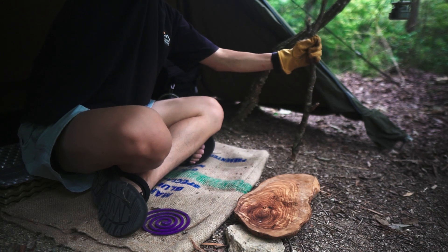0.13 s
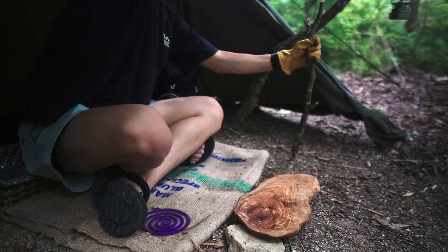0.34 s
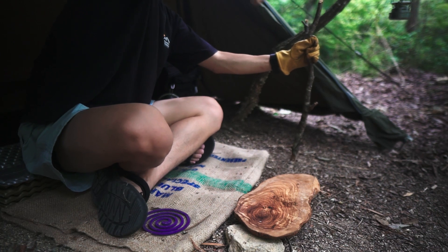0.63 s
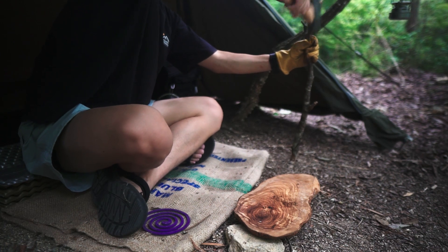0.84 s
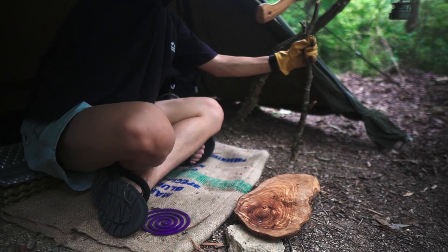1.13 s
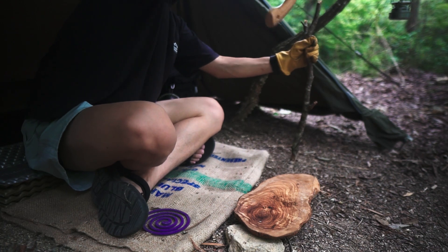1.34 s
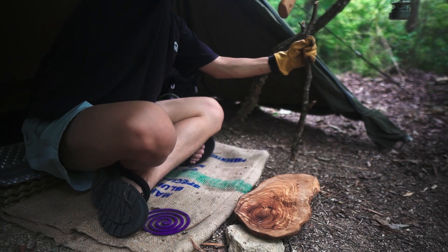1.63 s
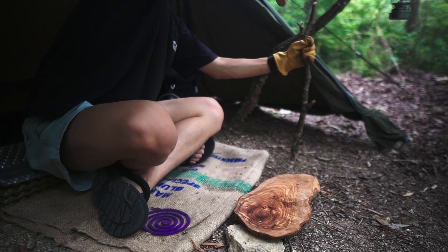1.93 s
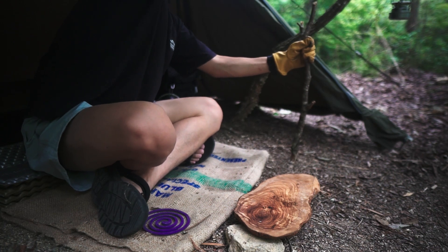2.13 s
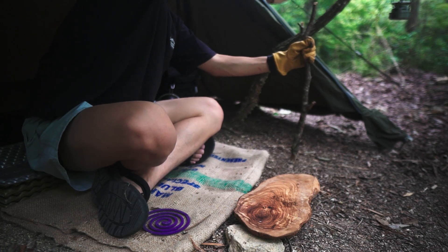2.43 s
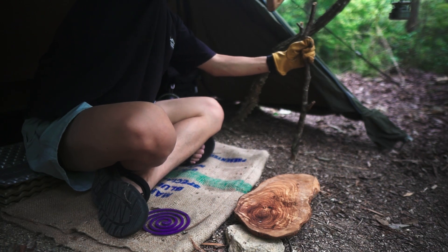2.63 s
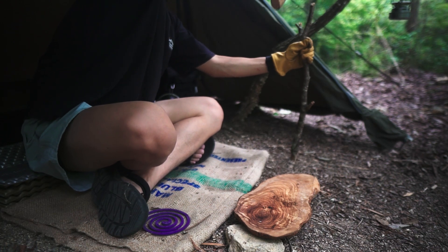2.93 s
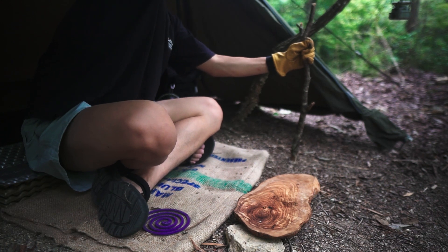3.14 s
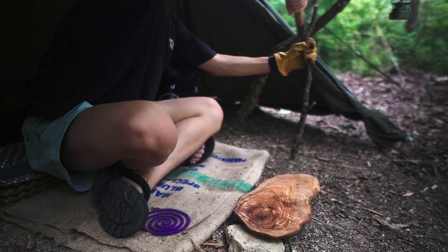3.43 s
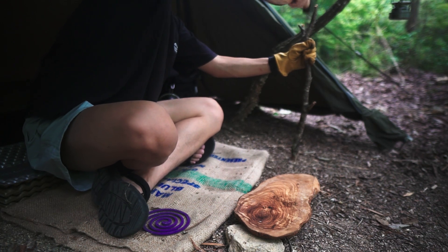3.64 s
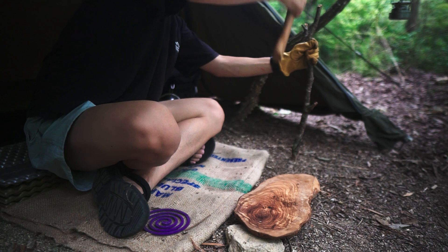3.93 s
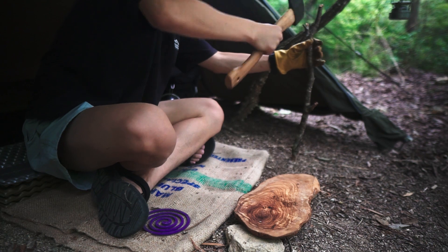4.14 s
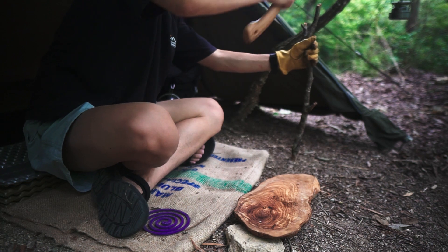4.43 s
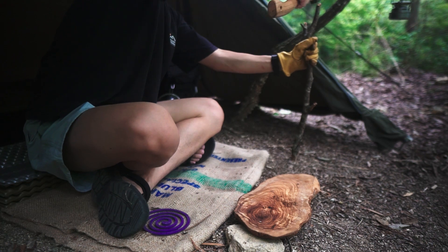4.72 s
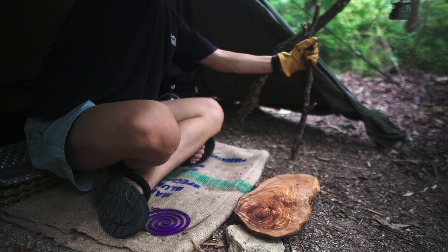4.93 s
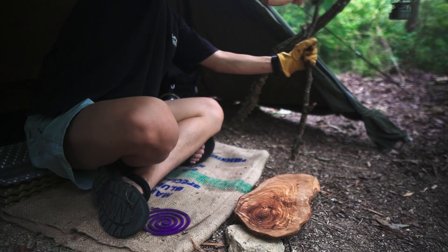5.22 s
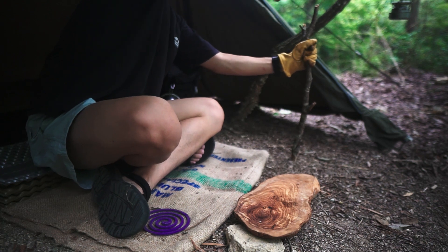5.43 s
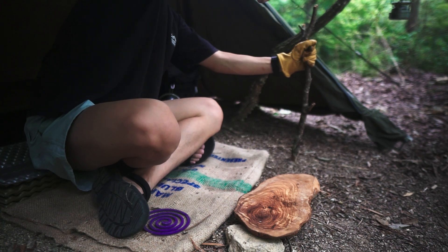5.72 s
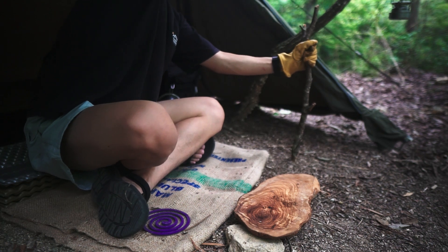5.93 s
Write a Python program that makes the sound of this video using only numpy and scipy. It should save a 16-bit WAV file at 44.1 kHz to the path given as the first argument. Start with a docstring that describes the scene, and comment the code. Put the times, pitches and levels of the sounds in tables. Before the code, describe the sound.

A hatchet drives a wooden stake into forest soil, so close that the blows slightly overload the microphone. Each is a short wooden crack with a dull ground thud and a brief echo. Two knocks land at 0.2 and 0.5 seconds, then a light, gritty graze on bark at 0.9. From 1.4 to 3.4 seconds come seven steady knocks, about three a second, the last thinner and brighter with a slight ring from the handle. The hammering pauses, and a sleeve rustles softly from 4 to 4.5 seconds. Two more blows land at 5.3 and 5.7 seconds, the last with a heavier thud. Throughout, distant insects make a faint high hiss, thin buzzes and repeated rising whistles over a low outdoor rumble. Nearer insects add clearer climbing calls around 4 seconds and again from 5 seconds until the end, at about 6.

```python
"""In a forest, a hatchet drives a wooden stake into the soil, so close that its cracks overload
the microphone. Each blow is a short crack of wood and a thud that the ground spreads into two
gliding waves; one stroke only grazes the bark. Far insects hiss, buzz and whistle on rising notes
over a low rumble. Later, nearer insects join in and a sleeve rustles as the arm comes down."""
import sys
import numpy as np
from scipy import signal
from scipy.fft import rfft, irfft
from scipy.io import wavfile

SR = 44100
rng = np.random.default_rng(int(sys.argv[2]) if len(sys.argv) > 2 else 0)


def master_out(mix):
    """Clip the mix to full scale and print it as 16-bit PCM to the path in sys.argv[1]."""
    frames = np.transpose(np.atleast_2d(mix))
    ceiling = np.clip(frames, -1, 1)
    pcm = np.round(ceiling * 32767).astype(np.int16)
    wavfile.write(sys.argv[1], SR, pcm)


N = 267687
TIME = np.arange(N) / SR

# Far insect whistles. Each row: start in seconds, length in seconds, top pitch in Hz, level in dB.
FAR_WHISTLES = [(0.0, 0.33, 1936, -42), (0.229, 0.4, 1900, -41), (0.791, 0.37, 1978, -40.5),
                (1.136, .46, 1900, -43), (1.581, 0.51, 1987, -40), (2.1, 0.31, 1914, -42.5),
                (2.37, .29, 1858, -41.5), (2.63, 0.35, 1987, -42), (2.98, 0.27, 1908, -40),
                (3.2, .33, 1994, -39), (3.519, 0.44, 1928, -43.5), (3.832, 0.32, 1984, -42),
                (4.421, 0.33, 1904, -44), (4.65, 0.28, 1870, -38.5), (5.41, 0.3, 1940, -36.5)]
# How well the insects send out each pitch. Each row: frequency in Hz, boost or cut in dB.
INSECT_RESPONSE = [(1400, -0.5), (2000, 0.5), (2650, -2.5), (3050, -10), (3400, 3), (3700, 3), (4100, 3),
                   (4800, 2), (5600, -8), (6200, -5), (10000, -18)]
# How loud the insect hiss is as time passes. Each row: time in seconds, level in dB.
HISS_LEVELS = [(0.0, -35), (0.42, -37), (0.69, -36.5), (1.42, -36.5), (1.52, -35), (1.89, -34.5),
               (2.69, -37.5), (3.33, -34), (3.52, -35), (3.82, -34), (4.11, -30.5), (4.33, -36),
               (4.68, -32.5), (5.14, -35), (5.8, -33), (6.07, -34.5)]
# The tone of the insects' hiss and of their high fizz. Each row: frequency in Hz, level in dB.
HISS_SPECTRUM = [(900, -26), (1300, -11), (1550, -3), (2000, -0.5), (2900, -2), (3900, 2), (4800, -1),
                 (6000, -8), (7500, -8.5), (9000, -20), (12000, -31)]
FIZZ_SPECTRUM = [(6000, -24), (9000, 6.5), (10300, 5.5), (12000, 0.5), (15000, 2.5), (16000, -6)]
# One thin insect's buzzes. Each row: start in seconds, length in seconds, level in dB.
BUZZ_PHRASES = [(0.0, 0.17, -51), (0.982, .22, -50.5), (1.57, .22, -68), (1.945, .17, -59),
                (2.329, .24, -59), (2.88, 0.19, -52), (3.202, .18, -58), (3.765, .24, -51.5),
                (4.26, 0.28, -47), (4.68, 0.42, -49.5), (5.352, 0.415, -48)]
# The tone of the outdoor rumble. Each row: frequency in Hz, level in dB.
RUMBLE_SPECTRUM = [(15, -9.5), (28, -31), (42, 8), (54, -11), (68, -0.5), (100, -5.5), (160, -12.5),
                   (300, -22.5), (600, -26.5), (1200, -27), (2500, -36)]
# Hatchet blows. Each row: time in seconds, crack level in dB, brightness in dB per octave,
# early thud, late thud, upper ground wave and handle levels in dB, pitch multiplier for the wood.
HATCHET_BLOWS = [(0.1985, 4.5, 0.5, 1, 1, 0.5, -12, 1.004), (0.5167, 2.5, 1.5, 2.5, 1.5, 1, -10, 1.02),
                 (1.44, -1, 1.5, 4, -0.5, 1, -12, 1), (1.7873, 2.5, 4.5, 2, 1, -0.5, -7, 1.01),
                 (2.1271, 2, 3, 2, 2.5, -1, -9, 1.05), (2.4493, 2, 2, 2, 2.5, -1.5, -30, 1.034),
                 (2.7648, 4.5, 1, 2.5, 2.5, -0.5, -28, 1.08), (3.0917, 4, 3, 1, 3, 0, -13, 1),
                 (3.4160, -1.5, 8.5, -13, -7.5, -1, 5, 0.86), (5.2871, 3.5, 0, 3.5, 1.5, 3.5, -29, 1.035),
                 (5.6861, -1.5, 1.5, 9, 1, 7, -27, 0.98)]
# The notes that ring in the struck end of the wood, the held stake, the hatchet's handle and the soil.
# Each row: frequency in Hz, level in dB, seconds to fade by 60 dB.
CRACK_MODES = [(495, -19, 0.0026), (936, -14, 0.014), (1239, -25, 0.041), (1944, -2, 0.0092),
               (2151, -2, 0.01), (3000, 1, 0.0072), (3273, -13, 0.018), (4313, 4, 0.0027),
               (5910, -4.5, 0.004), (7600, -6.5, 0.0026), (9440, -21, 0.0017)]
STAKE_MODES = [(305, -25.5, 0.15), (499, -25, 0.071), (553, -33, 0.039), (676, -25.5, 0.051),
               (1186, -27.5, 0.053), (2308, -31.5, 0.1), (3410, -26, 0.063), (3840, -19, 0.032)]
HANDLE_MODES = [(317, -32.5, 0.29), (435, -25.5, 0.068), (1630, -25, 0.04), (1810, -29, 0.28),
                (1840, -9.5, 0.028), (3150, -25, 0.12), (3790, -31, 0.059), (4850, -29.5, 0.13)]
SOIL_MODES = [(40.6, -28.5, 0.96), (70.1, -24, 0.74), (96.65, -18.5, 0.61), (136.4, -28.5, 0.76),
              (196.8, -29.5, 0.42), (294, -33, 0.25), (432.2, -22, .11), (465, -32, 0.29)]
# The tone of crushed fibres and of the echo from the trees. Each row: frequency in Hz, level in dB.
SPLINTER_SPECTRUM = [(300, -0.5), (600, 2), (1000, 1.5), (2000, -1), (3300, -8), (5000, -12.5), (8000, -29),
                     (15000, -44)]
ECHO_SPECTRUM = [(150, 18), (400, 1.5), (900, -4.5), (2000, 0), (4500, -2.5), (7000, -21), (15000, -27.5)]
# Two waves in the ground: the slow one brings mostly bass first, the upper one treble first.
# Each row: seconds after the shove, pitch in Hz, level in dB.
SLOW_GLIDE = [(0, 203, -18.5), (.006, 61, -14), (.02, 72, -19), (.033, 86, -10), (.047, 119, -12.5),
              (.062, 160, -19.5), (.08, 108, -25), (.11, 70, -28)]
UPPER_GLIDE = [(0.0, 300, -8.5), (0.012, 258.1, -43), (0.03, 250.7, -19), (0.05, 192.1, -34),
               (0.07, 178, -29), (0.11, 95.2, -41.5)]
# Small scrapes and ticks on the bark.
# Each row: start in seconds, length in seconds, level in dB, brightness in dB per octave.
BARK_SCRAPES = [(0.873, 0.011, -23, -0.5), (0.883, 0.014, -21.5, -1.5), (0.895, 0.016, -24, 1),
                (0.91, 0.0036, -20.5, 4), (1.9476, 0.004, -28, 1.5), (3.429, 0.0036, -19.5, 0),
                (4.806, 0.0044, -35, 2)]
# The tone of rubbing, for both bark and cloth. Each row: frequency in Hz, level in dB.
RUB_SPECTRUM = [(90, -35), (200, -6), (1200, -3.5), (3300, -2.5), (5200, -2.5), (7700, -22), (10700, -12.5),
                (15500, -27)]
# Nearer insects, one list for each call.
# Each row: time in seconds, pitch in Hz, level in dB, pitch spread in Hz, overtone level in dB.
NEAR_WHISTLES = [
    [(3.91, 2215, -46, 199, 1), (3.98, 2340, -37, 192, 2.5), (4.07, 2580, -30.5, 100, -13),
     (4.17, 2685, -32.5, 91.5, -4), (4.27, 2815, -30.5, 100.4, -1), (4.33, 3300, -31, 260, -5)],
    [(5.09, 1780, -40, 57.6, -11), (5.17, 1830, -43, 66, -6), (5.19, 2045, -36, 44.5, 0),
     (5.245, 2060, -32, 44.3, 0), (5.28, 2390, -35.5, 151, -2), (5.42, 2720, -39, 265, 3)],
    [(5.43, 2060, -50, 50, 7), (5.47, 2027, -42, 45, 10), (5.51, 2090, -46, 50.5, 7)],
    [(5.7, 1833, -48, 150, 4), (5.83, 1925, -43, 180.4, 9.5), (5.94, 2250, -40.5, 210, 4.5),
     (6.07, 2480, -33, 150, -3)],
]
# How loud the sleeve is as the arm comes down. Each row: time in seconds, level in dB.
SLEEVE_LEVELS = [(3.95, -89), (4.07, -37), (4.16, -44), (4.28, -36), (4.4, -41), (4.5, -63)]


def amp(db):
    """Turns decibels into a multiplier."""
    return 10 ** (np.asarray(db) / 20)


def unit(x):
    """Scales a sound to an average (rms) level of 1."""
    return x / np.sqrt(np.mean(x ** 2) + 1e-20)


def add(mix, start_s, sound):
    """Mixes a sound in at the given time."""
    part = mix[max(round(start_s * SR), 0):][:len(sound)]
    part += sound[:len(part)]


def colour(x, spectrum, tilt_db=0):
    """Shapes the tone of x, tilts it by tilt_db per octave and sets its level to 1."""
    octave = np.log2(np.fft.rfftfreq(len(x), 1 / SR) + 1)
    hz, db = np.transpose(spectrum)
    gain = amp(np.interp(octave, np.log2(hz), db) + tilt_db * octave)
    return unit(irfft(rfft(x) * gain, len(x)))


def noise(spectrum, size, tilt_db=0):
    """Random noise with the given tone."""
    return colour(rng.standard_normal(size), spectrum, tilt_db)


def drift(size, hz):
    """A wandering value that heads for a new random point hz times a second."""
    points = rng.standard_normal(2000)
    position = np.cumsum(hz * np.ones(size)) / SR
    return np.interp(position, np.arange(len(points)), points)


def fade(size, in_s, out_s):
    """A level that fades in, holds and fades out."""
    t = np.arange(size) / SR
    ramp = np.minimum(t / in_s, t[::-1] / out_s)
    return np.sin(np.pi / 2 * np.clip(ramp, 0, 1))


def whistle(hz, width_hz, rasp_db, overtone_db, waver, flutter_db=2):
    """A fuzzy, wavering insect call: narrow bands of noise on a pitch and its octave, plus a rasp."""
    size = len(hz)
    cycles = np.cumsum(hz * (1 + waver * drift(size, 25.1))) / SR
    call = amp(rasp_db) * noise(HISS_SPECTRUM, 32768)[:size]
    for harmonic, db in [(1, 0), (2, overtone_db)]:
        fuzz = drift(size, width_hz * harmonic) + 1j * drift(size, width_hz * harmonic)
        band = unit((fuzz * np.exp(2j * np.pi * harmonic * cycles)).real)
        response_db = np.interp(harmonic * hz, *np.transpose(INSECT_RESPONSE))
        call += amp(db + flutter_db * drift(size, 21.55) + response_db) * band
    return call


def far_whistles(level_db=-0.5, low_hz=1459, dip_hz=160.3, dip_s=0.04):
    """Each far insect call dips to a low note, climbs, and holds its top pitch."""
    out = np.zeros(N)
    for start_s, length_s, top_hz, db in FAR_WHISTLES:
        progress = np.linspace(0, 1, int(length_s * SR))
        climb = 1 / (1 + np.exp((0.45 - progress) / 0.085))  # steepest just before halfway
        dip = dip_hz * np.exp(-progress * length_s / dip_s)
        hz = low_hz + dip + (top_hz - low_hz) * climb
        width_hz = 130 + 120 * climb  # fuzzier as it climbs
        effort_db = 4.5 * np.log2(hz / top_hz)  # and louder too
        call = whistle(hz, width_hz, rasp_db=0.5, overtone_db=1.5, waver=0.01193)
        call *= fade(len(call), in_s=0.062, out_s=0.044)
        add(out, start_s, amp(db + level_db + effort_db) * call)
    return out


def insect_hiss(fizz_db=-25, flutter_db=1.5):
    """Many far insects blend into a wide hiss with a little fizz on top."""
    level = amp(np.interp(TIME, *np.transpose(HISS_LEVELS)) + flutter_db * drift(N, 40))
    return level * (noise(HISS_SPECTRUM, N) + amp(fizz_db) * noise(FIZZ_SPECTRUM, N))


def insect_buzzes(ramp_s=0.048):
    """A thin, very high insect buzzes in short phrases."""
    level = np.zeros(N)
    for start_s, length_s, db in BUZZ_PHRASES:
        add(level, start_s, amp(db) * fade(int(length_s * SR), ramp_s, ramp_s))
    return level * noise(FIZZ_SPECTRUM, N)


def outdoor_rumble(level_db=-38.5, swell_db=1):
    """The open air rumbles low, gently swelling and sinking."""
    return amp(level_db + swell_db * drift(N, 6)) * noise(RUMBLE_SPECTRUM, N)


def ring(modes, t, pitch=1):
    """Something struck at t = 0 rings with several notes, each dying away at its own rate."""
    t = np.maximum(t, 0)
    hz, db, fade_s = np.transpose(modes)[:, :, None]
    return (amp(db - 60 * t / fade_s) * np.sin(2 * np.pi * hz * pitch * t)).sum(0)


def crack(t, bright_db, ring_db=4, touch_s=0.0011, crush_s=0.0051, splinter_s=0.035):
    """Steel touches the frayed top, crushes it and hits solid wood; each blow has its own brightness."""
    modes = [(hz, db + bright_db * np.log2(hz / 2000), fade_s) for hz, db, fade_s in CRACK_MODES]
    detune = 1 + 0.015 * rng.standard_normal((len(modes), 1))  # no two blows land alike
    touch = amp(-13) * np.clip(1 + t / touch_s, 0, 1) ** 0.5
    after = np.maximum(t, 0)
    crush = amp(1 - 60 * after / crush_s) + amp(-13 - 60 * after / splinter_s)
    fibres = np.where(t < 0, touch, crush) * noise(SPLINTER_SPECTRUM, len(t), bright_db)
    return amp(ring_db) * ring(modes, t, detune) + fibres


def forest_echo(t, near_fade_s=0.34, far_fade_s=0.32, far_delay_s=0.031):
    """Sound bounces back from things nearby at once, then from the trunks farther off."""
    near = (t > 0) * amp(-27 - 60 * t / near_fade_s)
    far_t = t - far_delay_s
    far = np.clip(far_t / 0.0028, 0, 1) * amp(-29 - 60 * far_t / far_fade_s)
    return (near + far) * noise(ECHO_SPECTRUM, len(t))


def ground_wave(glide, t):
    """Soil carries each pitch at its own speed, so one shove arrives as a sliding note."""
    times, hz, db = np.transpose(glide)
    cycles = np.cumsum(np.interp(t, times, hz) * (t > 0)) / SR
    fade_db = -300 * np.maximum(t - times[-1], 0)
    return amp(np.interp(t, times, db) + fade_db) * np.sin(2 * np.pi * cycles)


def thud(t, early_db, late_db, upper_db, late_s=0.025):
    """The stake shoves the soil, which rings and carries two waves."""
    shove = -amp(np.interp(t, [0, late_s], [early_db, late_db]))  # the ground first moves down
    low = ground_wave(SLOW_GLIDE, t) + ring(SOIL_MODES, t)
    return shove * low + amp(upper_db) * ground_wave(UPPER_GLIDE, t)


def hatchet_blows(soil_lag_s=0.0021):
    """Each blow cracks, rings the stake and the handle, and shoves the ground."""
    out = np.zeros(N)
    t = np.arange(-128, SR // 2) / SR  # starts just before the hit, for the first touch
    for hit_s, crack_db, bright_db, early_db, late_db, upper_db, handle_db, pitch in HATCHET_BLOWS:
        wood = crack(t * pitch, bright_db) + ring(STAKE_MODES, t, pitch) + forest_echo(t)
        handle = amp(handle_db) * ring(HANDLE_MODES, t)  # rings when a blow lands off centre
        ground = thud(t - soil_lag_s, early_db, late_db, upper_db)
        add(out, hit_s + t[0], amp(crack_db) * wood + handle + ground)
    return out


def bark_scrapes(grain_db=4):
    """Steel skids over bark in short, gritty bursts."""
    out = np.zeros(N)
    for start_s, length_s, db, bright_db in BARK_SCRAPES:
        grains = rng.standard_normal(4096) * amp(grain_db * drift(4096, 2500))
        size = int(length_s * SR)
        scrape = unit(colour(grains, RUB_SPECTRUM, bright_db)[:size])
        add(out, start_s, amp(db) * scrape * signal.windows.tukey(size, 0.2))
    return out


def near_whistles(ramp_s=0.02):
    """Nearer insects sing clearer calls that climb higher, in steps."""
    out = np.zeros(N)
    for curve in NEAR_WHISTLES:
        times, *columns = np.transpose(curve)
        t = np.arange(times[0], times[-1], 1 / SR)
        hz, db, width_hz, overtone_db = (np.interp(t, times, column) for column in columns)
        call = whistle(hz, width_hz, rasp_db=-5.5, overtone_db=overtone_db, waver=0.0049)
        add(out, times[0], amp(db) * call * fade(len(t), ramp_s, ramp_s))
    return out


def sleeve_rustle(grain_db=3):
    """Cloth rubs as the arm with the hatchet is lowered."""
    level_db = np.interp(TIME, *np.transpose(SLEEVE_LEVELS), left=-120, right=-120)
    return amp(level_db + grain_db * drift(N, 65)) * noise(RUB_SPECTRUM, N)


def scene():
    """Adds the work, the insects and the rumble into one channel."""
    work = hatchet_blows() + bark_scrapes() + sleeve_rustle()
    insects = far_whistles() + near_whistles() + insect_hiss() + insect_buzzes()
    return (work + insects + outdoor_rumble())[None]


def record(dry):
    """The cracks overload the microphone, which flattens their peaks; the highest treble is cut."""
    clipped = np.clip(dry, -1, 1)
    low_pass = signal.firwin(255, cutoff=16000, window=("kaiser", 7), fs=SR)
    return signal.oaconvolve(clipped, low_pass[None], "same")


dry = scene()
out = record(dry)
master_out(out)
```